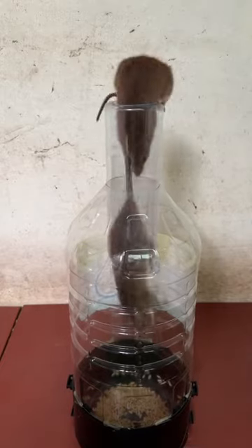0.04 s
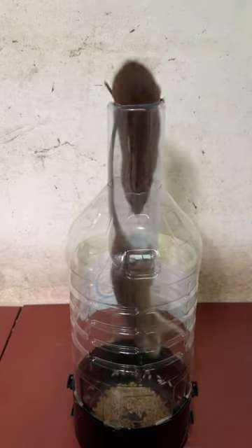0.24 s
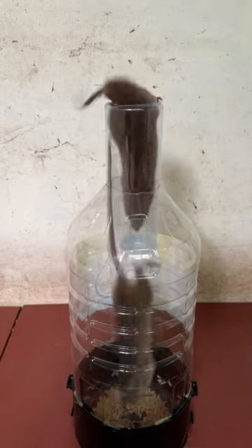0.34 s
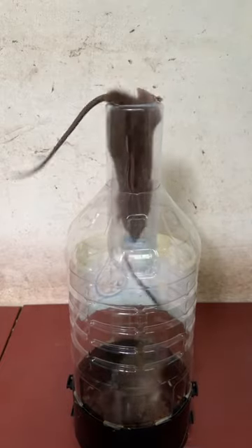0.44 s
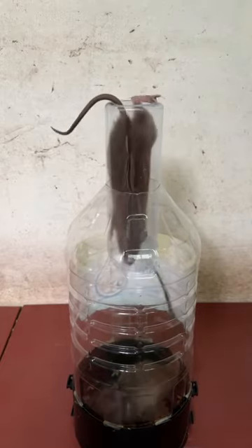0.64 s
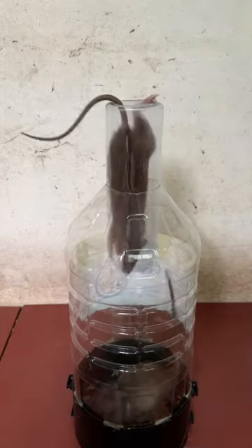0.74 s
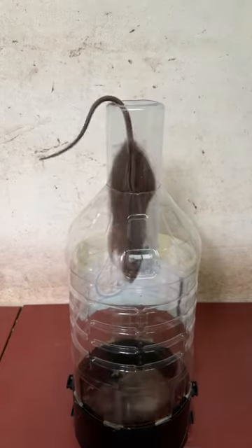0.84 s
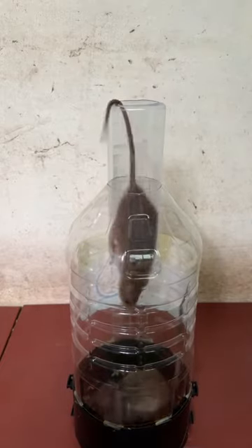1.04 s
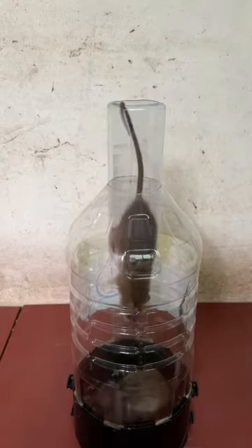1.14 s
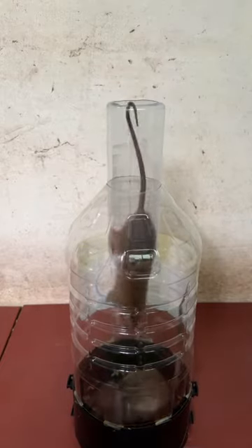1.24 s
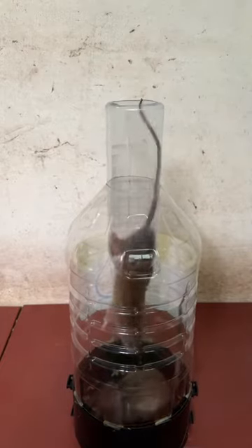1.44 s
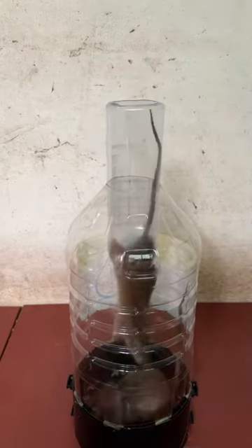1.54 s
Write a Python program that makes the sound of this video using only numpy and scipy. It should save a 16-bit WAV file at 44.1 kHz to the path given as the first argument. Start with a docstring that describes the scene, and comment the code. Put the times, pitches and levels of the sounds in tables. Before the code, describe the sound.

Hollow thump and plastic crackle as a rat drops into a bottle trap, claws ticking.

```python
"""A hollow thump and a crackle of plastic: a rat drops into a big bottle trap in a small, quiet room.
Rats are climbing down the neck, and something squeaks briefly, probably a paw slipping on the plastic.
The landing rings the bottle and the low room resonances it excites, and sets the thin wall snapping and
fluttering. Claws tick and scrabble, paws tap the ribs, and a second, softer thump follows. A close
stereo microphone hears it all with a short room tail, over a low rumble and faint hiss."""
import sys
import numpy as np
from scipy import signal
from scipy.fft import rfft, irfft
from scipy.io import wavfile
from scipy.ndimage import uniform_filter1d

SR = 44100
rng = np.random.default_rng(int(sys.argv[2]) if len(sys.argv) > 2 else 0)


def file_out(sig):
    """Save sig as 16-bit WAV at sys.argv[1]."""
    # one column per channel
    cols = np.atleast_2d(sig).T
    # limit, then scale
    lim = np.clip(cols, -1, 1)
    pcm = np.round(lim * 32767).astype(np.int16)
    wavfile.write(sys.argv[1], SR, pcm)


N = 70560
T = np.arange(N) / SR
HZ = np.fft.rfftfreq(2 * N, 1 / SR)


def body_thumps():
    """Soft blows ring the bottle and the room's low resonances, and set the thin wall fluttering."""
    # bodies hitting the bottle (time [s], strength [dB], contact time [ms], flutter trim [dB])
    blows = [(.003, -9, 0.94, -15), (0.0153, -30.5, 0.75, -18), (0.097, -20.5, 0.55, -6),
             (0.152, -11, 0.77, -12), (0.2058, -4.5, 0.29, -16.5), (0.2116, -2, 0.55, -2),
             (0.2235, 3, 0.63, -5), (0.444, -28.5, 0.16, 7), (.645, -16, 1, -0.5), (1.024, -24.5, 0.43, 11),
             (1.034, -12.5, 1, 7), (1.069, -21, 0.38, 7.5), (1.281, -29.5, 0.43, 5)]
    # the bottle's hollow modes and the low room resonances they excite, close pairs beating
    # (pitch [Hz], level [dB], t60 [s], direction of swing [+-1])
    modes = [(83.6, -40, 0.24, 1), (104, -47.5, 0.14, 1), (172.5, -34, 0.89, 1), (179.4, -18, 0.21, 1),
             (181.9, -30, 0.66, -1), (224.9, -32.5, 0.39, 1), (236.3, -19, 0.17, 1), (237.5, -37, 0.46, 1),
             (296.8, -28.5, 0.91, 1), (308, -27, 0.6, -1), (395, -56, 0.28, 1), (513, -34.5, 0.23, 1),
             (529, -23, 0.18, 1), (648, -39, 0.38, 1), (712, -29.5, 0.053, 1)]
    # colour of the wall's dense flutter (frequency [Hz], level [dB])
    flutter_eq = [(40, -12), (130, -18.5), (240, 6), (420, -5.5), (700, -2), (1100, -11), (2500, -16.5),
                  (6000, -83)]
    flutter_db, flutter_t60_s = -23, 0.22
    ring = sum(np.sign(way) * amp(db - 60 * T / t60) * np.cos(2 * np.pi * hz * T)
               for hz, db, t60, way in modes)
    out, t = np.zeros(N), np.arange(-176, 177) / SR
    for s, db, contact_ms, trim_db in blows:
        push = np.exp(-.5 * (t * 1e3 / contact_ms) ** 2)
        flutter = unit(colour(rng.standard_normal(N), flutter_eq)[:N])
        flutter *= amp(flutter_db + trim_db - 60 * T / flutter_t60_s)
        add(out, s + t[0], amp(db) * signal.fftconvolve(ring + flutter, push / push.sum()))
    return out


def wall_snaps(size=2048, rise_ms=0.52):
    """Each snap of the wall or tick of a claw is a noise burst of a few milliseconds in the plastic."""
    # snaps and claw ticks (time [s], level [dB], decay [ms], brightness [dB/octave])
    snaps = [(.0045, -34.5, 6.1, -6.5), (.0885, -41, 6, 2.5), (0.096, -27, 1.5, 8), (.146, -36.5, 3, -2),
             (.2018, -24.5, 1.85, -2.5), (0.2061, -29.5, 2.9, -0.5), (.2105, -14, 1.24, 1.5),
             (.2172, -15.5, 1.16, -3), (0.226, -18, 1.35, 3), (.236, -34.5, 6.8, -11.5),
             (0.275, -30.5, 3.45, 4.5), (0.279, -35.5, 1.8, -2.5), (0.3822, -33.5, 1.84, 1),
             (0.4426, -30.5, 1.19, -0.5), (.525, -45, 1, 19), (0.906, -50, 2.6, -3), (1.002, -49, 3, 12),
             (1.014, -50, 10.4, 8), (1.033, -55.5, 3.1, 1), (1.257, -57, 3.6, 9)]
    # colour of snapping plastic (frequency [Hz], level [dB])
    plastic_eq = [(150, -4), (600, -0.5), (950, -2.5), (1350, 1), (1650, -3), (2500, 3), (3300, -2.5),
                  (4600, -4), (5400, -7), (6000, -4.5), (6900, -1), (7600, -8), (9300, -5), (11500, -16.5),
                  (15500, -11)]
    out, ms = np.zeros(N), T[:size] * 1e3
    for s, db, decay_ms, tilt_db in snaps:
        envelope = (1 - np.exp(-ms / rise_ms)) * np.exp(-ms / decay_ms)
        burst = np.sign(rng.standard_normal(size)) * envelope
        add(out, s, amp(db) * colour(burst, plastic_eq, tilt_db))
    return out


def claw_scrapes(grains_per_s=6000, spread_db=2.5, roundness=0.2):
    """Claws and fur slide on the wall, each slide a swell of tiny catches of uneven size."""
    # slides (start [s], length [s], level [dB], brightness [dB/octave])
    slides = [(0, 0.025, -44.5, 2), (0.031, 0.042, -40, 6), (0.069, 0.14, -50, 2), (0.138, 0.066, -41.5, 3),
              (.29, 0.092, -72.5, 4.5), (.343, 0.013, -49, -1.5), (0.407, 0.052, -58.5, -1.5),
              (0.485, 0.014, -54.5, -2.5), (0.631, 0.086, -57.5, 1.5), (0.717, 0.034, -57.5, 0.5),
              (0.756, .11, -69, -1), (.855, 0.014, -56.5, -4), (0.888, 0.086, -63, -1),
              (1.191, .12, -64.5, -6), (1.245, 0.12, -63.5, 2.5), (1.362, .03, -58, -6.5),
              (1.584, 0.047, -55, 5)]
    # colour of sliding on plastic (frequency [Hz], level [dB])
    slide_eq = [(200, -20), (700, 2.5), (1400, -2.5), (2400, -1), (4200, -12.5), (6500, -11), (9000, -8.5),
                (12000, -19.5), (15500, -5)]
    out = np.zeros(N)
    for s, length, db, tilt_db in slides:
        grains = rng.standard_normal(N) * (rng.random(N) < grains_per_s / SR)
        grains *= amp(spread_db * np.minimum(rng.exponential(1, N), 3))
        swell = np.sin(np.pi * T[T < length] / length) ** roundness
        add(out, s, amp(db) * colour(unit(grains[:len(swell)]) * swell, slide_eq, tilt_db))
    return out


def rib_taps(count=5, size=8192, pitch_spread=0.091, rise_s=0.00067):
    """A tapped rib of the wall rings briefly at its own pitch, with weaker neighbours around it."""
    # paws on single ribs (time [s], level [dB], pitch [Hz], t60 [s])
    taps = [(.0042, -30.5, 2130, 0.015), (.007, -38, 778, 0.068), (.008, -38.5, 1120, .05),
            (.202, -40, 1990, 0.084), (.207, -36.5, 1350, 0.097), (.207, -35.5, 2480, 0.093),
            (.385, -50, 507, 0.14), (.442, -46, 736, .07), (.859, -61, 2350, 0.078),
            (1.015, -42.5, 431.5, 0.12), (1.021, -27.5, 239.7, 0.14), (1.024, -45, 673, .08),
            (1.204, -48, 635, 0.13), (1.278, -45, 458, 0.17), (1.364, -56, 1805, .05),
            (1.374, -70, 863, 0.044)]
    out, t = np.zeros(N), T[:size]
    for s, db, hz, t60 in taps:
        near_hz = hz * (1 + pitch_spread * rng.standard_normal((count, 1)))
        neighbours = np.sin(2 * np.pi * (near_hz * t + rng.random((count, 1)))).sum(0)
        envelope = amp(db - 60 * t / t60) * (1 - np.exp(-t / rise_s))
        add(out, s, envelope * (np.sin(2 * np.pi * hz * t) + neighbours / np.sqrt(2 * count)))
    return out


def paw_squeak(chatter_hz=134, chatter_depth=0.38, jitter=0.004):
    """A short stick-slip tone that chatters most while it is loud."""
    # contour of the squeak (time [s], pitch [Hz], level [dB])
    contour = [(0.145, 1492, -50), (.154, 1833, -33), (0.163, 1883, -32), (0.171, 1982, -33),
               (0.174, 1973, -43), (0.183, 1877, -35), (0.194, 2020, -36), (0.201, 1980, -53)]
    s, hz, db = np.transpose(contour)
    wobble = unit(uniform_filter1d(rng.standard_normal(N), 90))
    cycles = np.cumsum(np.interp(T, s, hz) * (1 + jitter * wobble)) / SR
    level = amp(np.interp(T, s, db, left=-150, right=-150))
    chatter = 0.5 + chatter_depth * level / level.max() * np.cos(2 * np.pi * chatter_hz * (T - s[1]))
    return level * chatter * np.sin(2 * np.pi * cycles)


def claw_tick(at_s=.0957, db=-30, decay_ms=1.4, size=1024):
    """One very bright claw tick from straight ahead, reaching both microphone ports together."""
    # colour of the tick (frequency [Hz], level [dB])
    tick_eq = [(2000, -34), (8000, -13.5), (12000, -11), (14000, 1), (16000, 0)]
    burst = np.sign(rng.standard_normal(size)) * np.exp(-T[:size] * 1e3 / decay_ms)
    out = np.zeros(N)
    add(out, at_s, amp(db) * colour(burst, tick_eq))
    return out


def reverb(x, t60s):
    """A diffuse tail, each band dying at its own speed; the bass stays central."""
    # stereo width of the tail (frequency [Hz], side level [dB])
    width = [(100, -37), (300, -11.5), (600, -1), (1200, -10.5), (3500, -2.5), (7000, -0.5), (11000, -18.5),
             (15000, -11.5)]
    hz, t, bands = signal.stft(rng.standard_normal((2, SR)), SR, nperseg=256)
    mid, side = bands * amp(-60 * t / read(t60s, hz)[:, None])
    side *= amp(read(width, hz))[:, None]
    tail = signal.istft(np.array([mid + side, mid - side]), SR, nperseg=256)[1]
    return signal.fftconvolve(x[None], tail / np.linalg.norm(tail[0]), axes=1)[:, :N]


def room_tone(db=-45.5):
    """Steady room noise: a low rumble under a faint hiss."""
    # colour of the room noise (frequency [Hz], level [dB])
    room_eq = [(15, -50), (29, -24), (38, 2), (52, 3), (63, -9), (95, -7), (128, -19), (170, -5),
               (205, -13), (300, -14), (380, -21), (600, -23), (1000, -33), (1700, -42), (2700, -41),
               (4000, -49), (5200, -49), (6500, -41), (7400, -46), (8800, -57), (15500, -59)]
    # likeness of left and right (frequency [Hz], correlation [0-1])
    likeness = [(50, 1), (280, 0.99), (650, 0.48), (3000, 0.45), (7000, 0.46), (15000, 1)]
    left, independent = rfft(rng.standard_normal((2, 2 * N)))
    shared = np.clip(read(likeness, HZ), 0, 1)
    right = shared * left + np.sqrt(1 - shared ** 2) * independent
    spectra = np.array([left, right]) * amp(read(room_eq, HZ))
    return amp(db) * unit(irfft(spectra)[:, :N])


def mic_ports(x):
    """Sound from off axis drifts out of phase between the two microphone ports in the treble."""
    # lead of the left port over the right (frequency [Hz], phase [rad])
    left_lead = [(20, 0), (2500, 0), (4500, .3), (5800, -.4), (7200, -1.2), (9200, -2.15), (10400, -2.95),
                 (12800, -3.25), (14000, -3.6), (15500, -3.8)]
    turn = np.exp(.5j * read(left_lead, HZ) * np.array([[1], [-1]]))
    return irfft(rfft(x, 2 * N) * turn)[:, :N]


def amp(db):
    """Decibels to gain."""
    return 10 ** (np.asarray(db) / 20)


def unit(x):
    """Scales to an rms of one."""
    return x / np.sqrt(np.mean(x ** 2) + 1e-20)


def read(points, hz):
    """Reads a table on a log-frequency axis."""
    f, value = np.transpose(points)
    return np.interp(np.log(hz + 1), np.log(f + 1), value)


def add(mix, s, sound):
    """Mixes a sound in at s seconds."""
    part = mix[max(round(s * SR), 0):][:len(sound)]
    part += sound[:len(part)]


def colour(x, eq, tilt_db=0, size=2048):
    """Minimum-phase EQ of unit energy, tilted by tilt_db per octave above 500 Hz."""
    hz = abs(np.fft.fftfreq(size, 1 / SR))
    log_gain = np.log(amp(read(eq, hz) + tilt_db * np.log2(np.maximum(hz, 500) / 3000)))
    impulse = np.fft.ifft(np.exp(np.conj(signal.hilbert(log_gain)))).real[:size // 2]
    return signal.fftconvolve(x, impulse / np.linalg.norm(impulse))


def scene():
    """The crackle rings the air in the bottle; thumps, crackle, taps and squeak carry into the room."""
    # ring of the air in the bottle (frequency [Hz], t60 [s])
    cavity_decay = [(200, 0.45), (2000, 0.16), (12000, 0.076)]
    # reverberation of the small room (frequency [Hz], t60 [s])
    room_decay = [(150, 0.94), (1000, 0.51), (5000, 0.64), (14000, 0.32)]
    thumps = body_thumps()
    crackle = wall_snaps() + claw_scrapes()
    taps, squeak = rib_taps(), paw_squeak()
    close = thumps + taps + squeak + crackle + amp(-4) * reverb(crackle, cavity_decay)
    room_send = amp(-10) * (crackle + taps) + amp(-16) * thumps + amp(-17) * squeak
    return mic_ports(close + reverb(room_send, room_decay) + room_tone()) + claw_tick()


def record(dry, cutoff_hz=15900):
    """A steep low-pass takes off the very top of the treble."""
    lowpass = signal.firwin(511, cutoff_hz, window=("kaiser", 9), fs=SR)
    return signal.oaconvolve(dry, lowpass[None], "same")


dry = scene()
out = record(dry)
file_out(out)
```